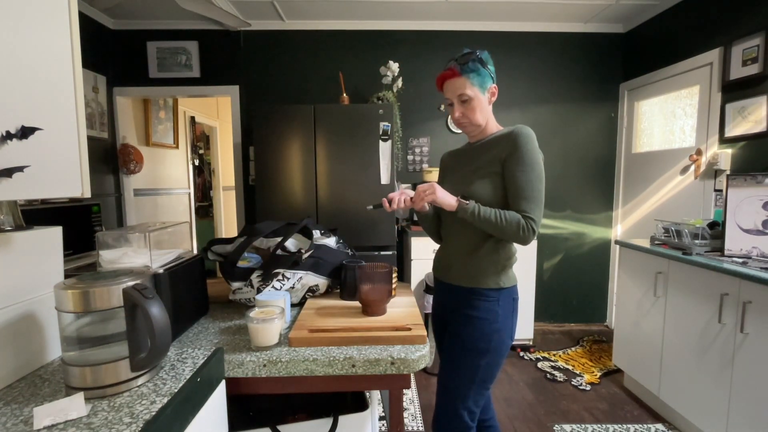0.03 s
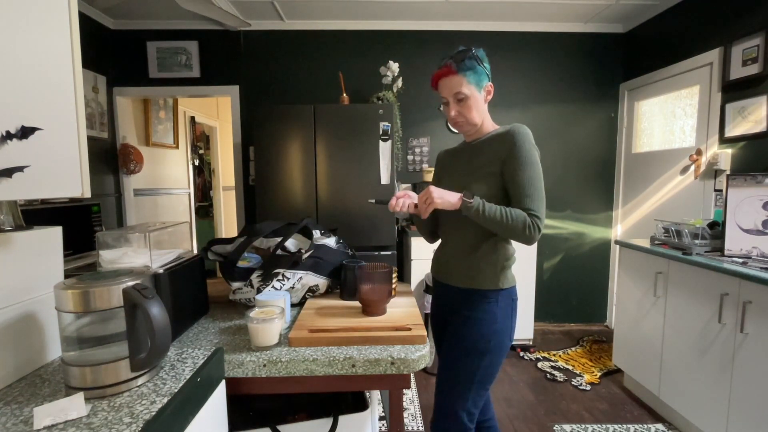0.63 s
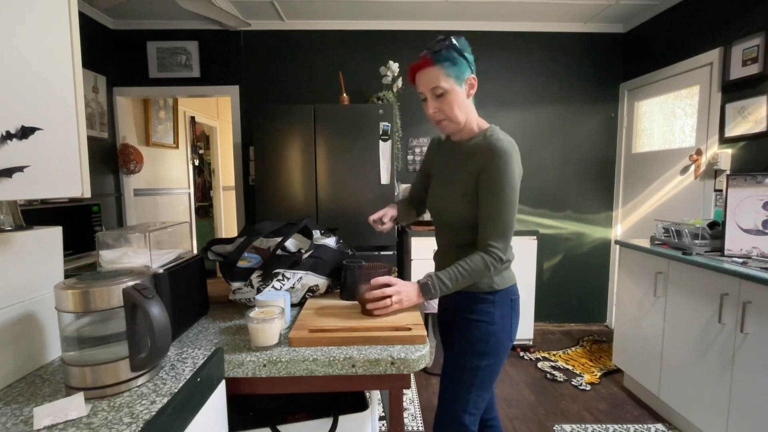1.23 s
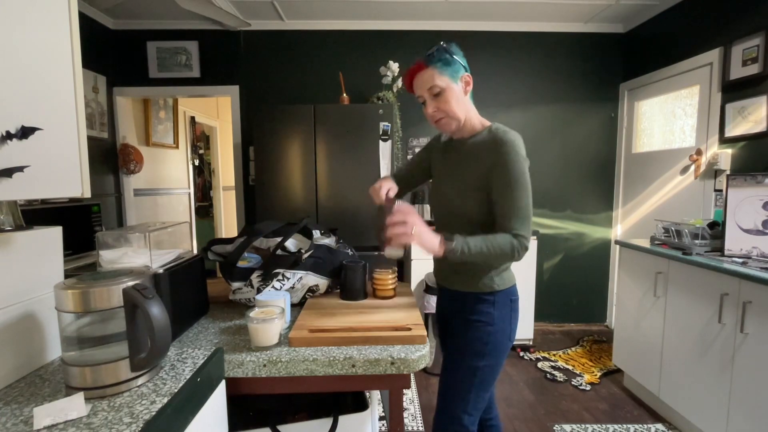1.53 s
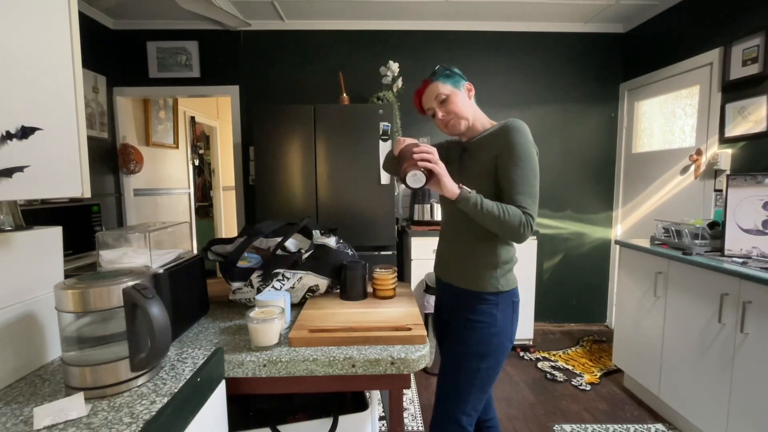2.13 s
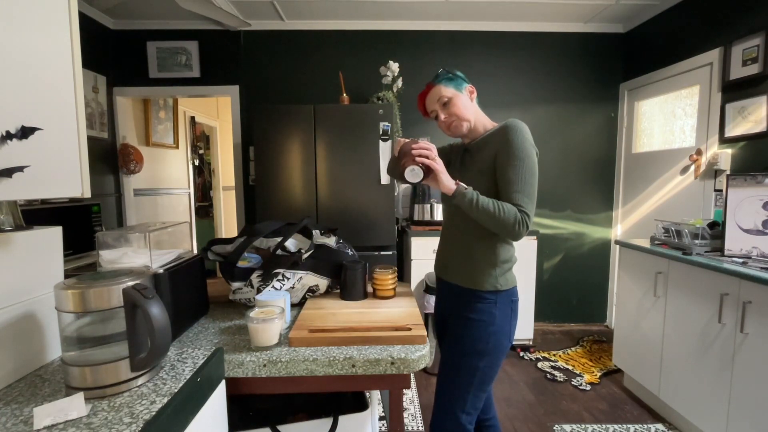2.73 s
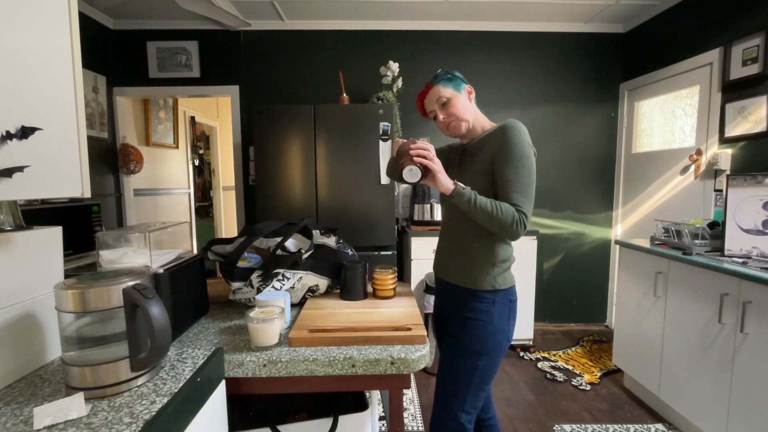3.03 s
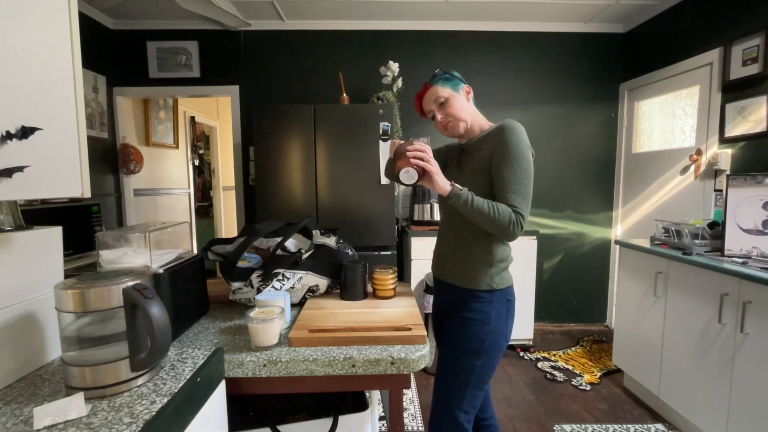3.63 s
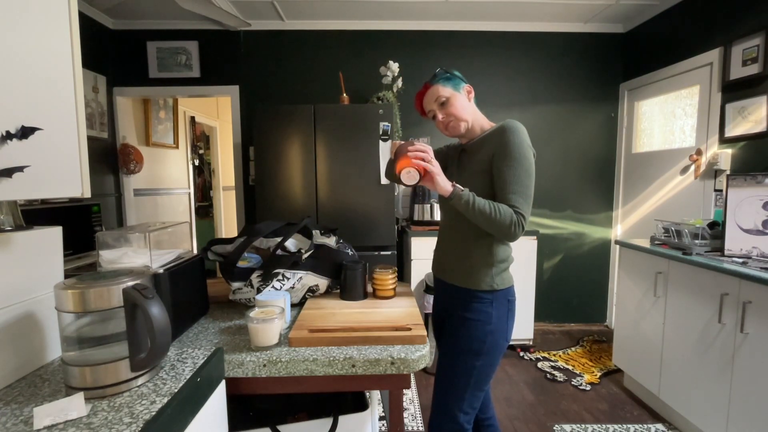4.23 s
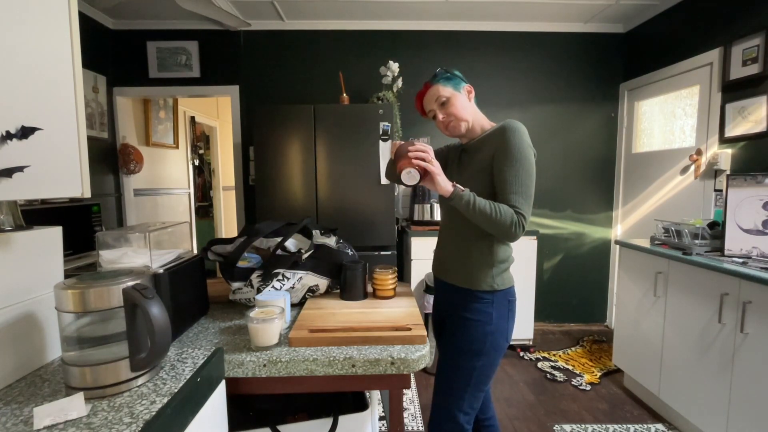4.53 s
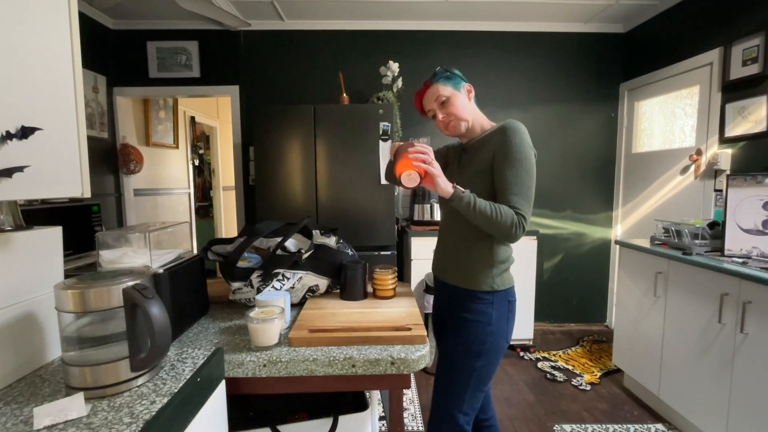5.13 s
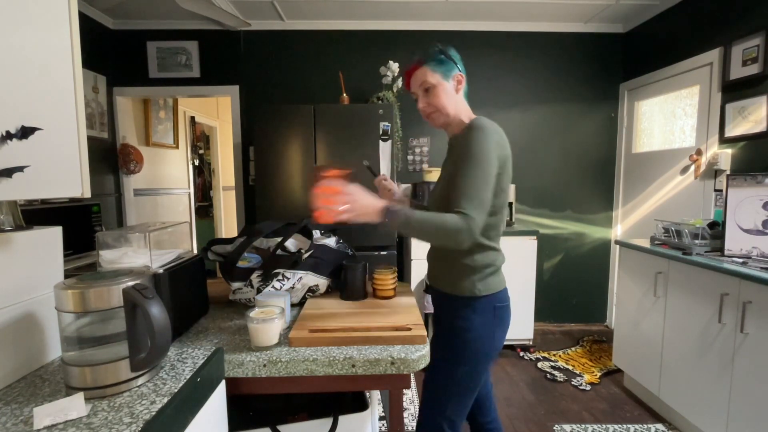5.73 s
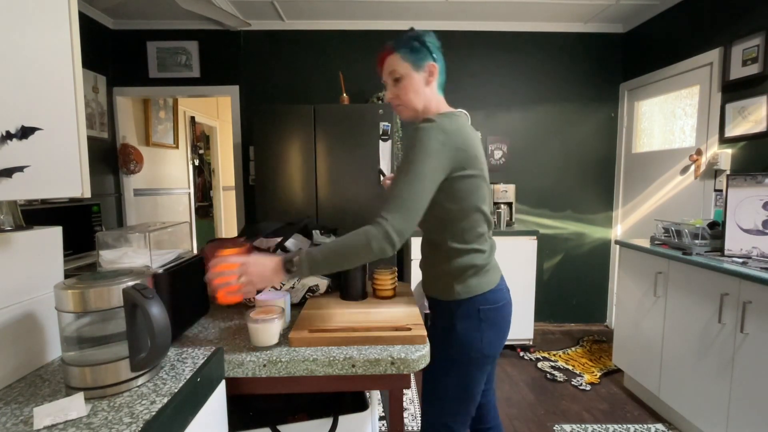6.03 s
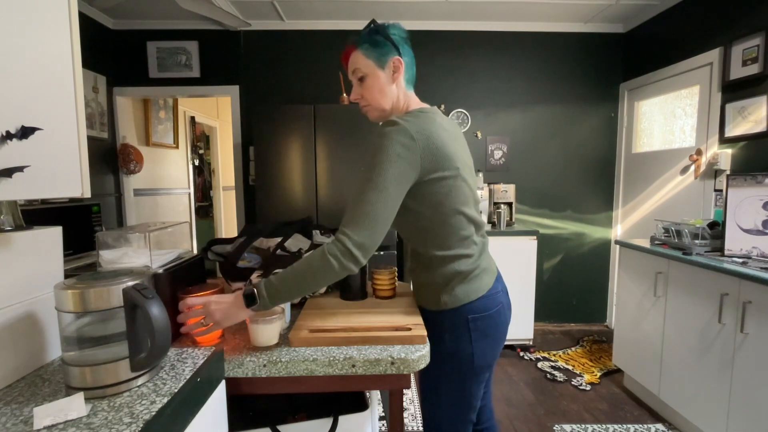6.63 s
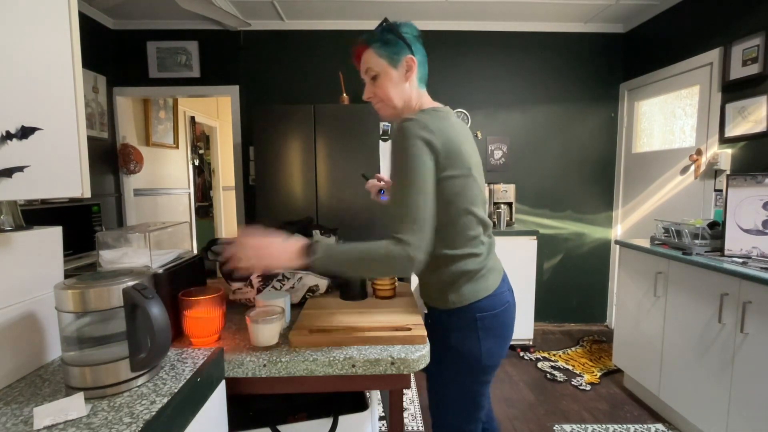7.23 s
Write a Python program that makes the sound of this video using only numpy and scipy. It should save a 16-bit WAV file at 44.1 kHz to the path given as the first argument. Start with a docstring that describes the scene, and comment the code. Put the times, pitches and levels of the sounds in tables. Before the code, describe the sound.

A low, steady rumble fills a small, quiet kitchen throughout. For the first two seconds, sleeves rustle faintly and fingers slide over a gas lighter and a glass candle jar, with soft low bumps and small clicks, the sharpest at about 1 second. From 2 seconds, gas hisses and spits quietly while the flame flutters in uneven little flares, sounding hollow inside the jar. The hiss drops out around 3 seconds, returns at 3.5 and stops with the flame near 5.4. Faint cloth rustles and finger rubs follow. At about 6.7 seconds the jar meets the stone counter with a loud thud, then a sharper clack at 6.9. These two knocks are by far the loudest sounds, with a brief glass ring and a short room echo. A soft bump and a tiny click close at around 7.3 seconds.

```python
"""A quiet kitchen, small and hard-walled, with a low rumble. Sleeves rustle and fingers slide as a gas
lighter is handled and clicked, then held down a glass candle jar. The gas hisses and spits, and the
flame flutters with a roar that the jar and the room make hollow. Last, the jar is set on a stone
counter with two knocks that thump the stone, set the glass ringing and echo in the room."""
import sys
import numpy as np
from scipy import signal
from scipy.fft import rfft, irfft, next_fast_len
from scipy.io import wavfile
from scipy.ndimage import map_coordinates

SR = 44100
rng = np.random.default_rng(int(sys.argv[2]) if len(sys.argv) > 2 else 0)


def master(y):
    """Save y as 16-bit WAV."""
    cut = np.clip(np.atleast_2d(y).T, -1, 1)
    pcm = np.round(cut * 32767)  # scale
    wavfile.write(sys.argv[1], SR, pcm.astype(np.int16))


N = 325017
TAIL_SAMPLES = 32768  # length of an echo or a ring
TOP_HZ = 15800

# A fade time is how long a sound takes to drop by 60 dB. A TONE table says how strong each pitch is.
# the kitchen's echo: (frequency [Hz], fade time [s])
ROOM_FADE = [(80, 0.77), (250, 0.3), (700, 0.4), (1500, 0.45), (4000, 0.42), (8000, 0.38), (13000, 0.48)]
# how alike the left and right sides sound: (frequency [Hz], likeness [0 to 1])
LIKENESS = [(60, 1), (120, 0.69), (250, 0.16), (450, 0), (10000, 0.04)]
# background rumble, deeper drone and thin hiss: (frequency [Hz], gain [dB])
RUMBLE_TONE = [(25, -42), (42, -11.5), (62, 5), (80, 0), (100, -4.5), (120, -7), (150, -20), (200, -20),
               (300, -31), (500, -44), (1200, -120)]
DRONE_TONE = [(18, -47.5), (30, -29.5), (39, -10), (48, 6.5), (58, -6.5), (75, -13.5), (120, -50.5),
              (300, -120)]
AIR_TONE = [(200, -30), (330, -8), (520, -7), (700, -9.5), (1400, -16), (3000, -20.5), (7000, -21.5),
            (9800, -19.5), (11000, -29), (12800, -31.5), (15000, -56)]

# sleeves brush, and fingers slide over lighter and jar: (time [s], length [s], level [dB])
SLEEVE_RUBS = [(.16, .05, -70), (.77, 0.14, -76.5), (.89, 0.13, -69), (1.155, 0.025, -62), (1.24, .08, -76),
               (1.52, 0.34, -86.5), (5.39, 0.038, -67), (5.595, 0.089, -65.5), (5.72, 0.17, -72),
               (5.89, 0.083, -66.5), (6.16, 0.098, -66), (6.375, .03, -68.5), (6.47, 0.27, -75),
               (6.635, 0.056, -59.5)]
FINGER_SLIDES = [(.24, .05, -83), (.4, 0.094, -71), (.48, 0.05, -65.5), (.62, 0.056, -76),
                 (.75, 0.059, -74.5), (.95, 0.12, -74.5), (1.17, 0.091, -75.5), (5.53, 0.74, -81),
                 (6.21, 0.25, -72.5), (6.5, .17, -72.5)]
# rubbing cloth and rubbing skin: (frequency [Hz], gain [dB])
SLEEVE_TONE = [(150, -5), (350, -1.5), (900, -0.5), (1400, -4), (2000, -7.5), (3200, -26), (8000, -26.5),
               (15000, -65)]
FINGER_TONE = [(300, -27.5), (1000, -8), (1900, 4.5), (3200, -1.5), (5000, -6.5), (8000, -9),
               (11500, -16.5), (15000, -50.5)]
# pitches that the sliding brings out: (frequency [Hz], width [Hz], boost [dB])
FINGER_PEAKS = [(3060, 510, 4.5), (4400, 610, 6.5)]
# soft low bumps: (time [s], level [dB])
SOFT_BUMPS = [(.27, -49.5), (1.163, -49.5), (1.597, -63), (7.051, -49.5), (7.211, -60)]
# a faint hum swells twice: (time [s], length [s], level [dB])
HUM_SWELLS = [(.44, 0.38, -64.5), (.93, 0.11, -63)]

# small clicks of lighter and glass, and a soft pop as the flame flares:
# (time [s], snap level [dB], pitch [Hz], boost at that pitch [dB], body compared with snap [dB])
SMALL_CLICKS = [(0.5296, -62, 5000, 14, -8.5), (0.7328, -63.5, 2850, 5.5, -3.5),
                (0.9567, -68, 3550, 6, -2.5), (1.056, -50.5, 7200, 11.5, -14), (1.062, -59, 7300, 23, -1.5),
                (1.2543, -72.5, 8900, 13, 0), (1.3421, -63.5, 8100, 8, -20),
                (1.847, -67.5, 8200, 10.5, -18), (2.037, -73, 9200, 20, -2), (4.457, -77, 3880, 6, 8),
                (5.183, -80, 3600, 7, 4), (5.911, -72, 7800, 13, -8), (6.3957, -68, 6740, 9, -4),
                (7.3394, -66.5, 6220, 5.5, 0)]
# a click's bright snap and its duller body: (frequency [Hz], gain [dB])
SNAP_TONE = [(800, -13.5), (2800, 6.5), (5500, -2), (9000, -1), (12000, -9), (15000, -31)]
BODY_TONE = [(100, -40.5), (600, -7), (1100, 3.5), (2200, -1.5), (4000, -15.5), (15000, -58)]

# the flame flares up: (time [s], length [s], roar level [dB], rasp level [dB])
FLAME_FLARES = [(2.029, 0.11, -60.5, -67.5), (2.176, 0.073, -64, -90), (2.368, 0.084, -62, -67.5),
                (2.47, 0.054, -66, -72), (2.558, 0.13, -61, -70.5), (2.702, 0.067, -62.5, -82),
                (2.85, .04, -74, -97), (2.898, 0.021, -61, -95), (3.13, .03, -77.5, -98),
                (3.194, 0.046, -61, -73), (3.297, 0.06, -55, -63.5), (3.546, 0.1, -73.5, -93),
                (3.662, 0.038, -67, -79), (3.721, 0.11, -63, -68.5), (3.858, 0.16, -72, -93),
                (4.046, .03, -82, -74), (4.34, 0.029, -69, -82), (4.444, 0.056, -59.5, -67),
                (4.536, .08, -67, -92), (4.625, 0.028, -60, -80), (4.708, 0.035, -73, -95),
                (4.843, .04, -69, -80), (4.957, 0.047, -62, -80), (5.063, 0.051, -61.5, -76),
                (5.172, 0.058, -65, -69.5)]
# the flame's roar and the rasp of its torn edge: (frequency [Hz], gain [dB])
ROAR_TONE = [(200, -11), (450, -2), (680, 2), (1100, 1), (1450, -14.5), (2400, -13), (5000, -20),
             (8000, -14.5), (15000, -51)]
RASP_TONE = [(300, -2), (1200, 5), (2800, 0.5), (5000, -2.5), (8000, -4), (11500, -5.5), (15000, -55)]
# hollow pitches of the jar and the room that colour the roar: (frequency [Hz], width [Hz], boost [dB])
HOLLOW_PEAKS = [(652, 36, 9.5), (784, 27, 15), (868, 31, 4), (813, 280, 4.5), (1957, 170, 23.5),
                (3930, 67, 0), (5100, 110, -6)]
# the jar's high overtones: (frequency [Hz], width [Hz], boost [dB])
WHISTLE_PEAKS = [(3820, 200, 6), (5120, 180, 8)]
# the gas jet spits: (time [s], level [dB], pitch [Hz], width [Hz], fade time [s])
GAS_SPITS = [(2.038, -71, 15200, 910, 0.068), (2.06, -72, 3730, 90, 0.68), (2.21, -69, 7700, 2250, 0.72),
             (2.434, -66, 4320, 1200, 0.44), (4.065, -68.5, 10000, 2500, 0.35),
             (5.19, -75, 6940, 7000, 0.56), (5.247, -66, 1930, 3520, 0.33)]
# gas flow, one list for each of the two times the lighter is held: (time [s], relative level [dB])
GAS_HOLDS = [
    [(2.04, -74), (2.13, -73), (2.182, -79), (2.222, -77), (2.42, -83), (2.44, -73), (2.624, -70),
     (2.816, -79), (2.9, -89)],
    [(3.5, -92), (3.562, -79.5), (4.106, -75), (4.156, -83), (4.638, -82), (4.804, -69.5), (4.928, -80.5),
     (5.266, -79.5), (5.36, -100)],
]
# gas leaving the nozzle: (frequency [Hz], gain [dB])
JET_TONE = [(400, -34.5), (1500, -12), (3000, -10), (4000, -8.5), (7000, -4.5), (9500, 6), (11500, 2),
            (12600, -13), (15000, -36.5)]

# the jar meets the counter, first on its edge, then flat:
# (time [s], thud level [dB], clack level [dB], ring gain [dB], hardness as a treble limit [Hz])
JAR_CONTACTS = [(6.679, -27, -47, -64, 4500), (6.682, -14, -39.5, -32, 1900), (6.72, -27, -62.5, -49, 1800),
                (6.745, -26.5, -62.5, -42, 1495), (6.8716, -29, -26.5, -31, 9000),
                (6.876, -16.5, -30.5, -40.5, 3500)]
# the thud of counter and jar base, and the clack of glass on stone: (frequency [Hz], gain [dB])
THUD_TONE = [(40, -34), (105, -10.5), (190, -16.5), (330, -16.5), (420, -9.5), (490, -1), (800, -2),
             (1100, -1.5), (1280, -8.5), (1900, -14), (2700, -20), (3800, -32), (6500, -62.5),
             (14000, -77.5)]
CLACK_TONE = [(400, -38.5), (1500, -10), (2700, 6.5), (4000, -1), (5600, -8.5), (7000, -24.5), (8000, -9.5),
              (9500, -22), (11000, -52), (15000, -41)]
# pitches at which the counter and jar base boom: (frequency [Hz], width [Hz], boost [dB])
THUD_PEAKS = [(247, 14, 15.5), (864, 65, 10.5), (1427, 26, 11)]
# notes of the jar and counter ringing together: (frequency [Hz], relative level [dB], fade time [s])
RING_NOTES = [(251, -6, .42), (503, -2, .33), (611, -3, .33), (721, 0, .36), (797, -1, .3), (878, 12, .32),
              (939, 5, .32), (1073, 6, .34), (1176, -4, .33), (1355, -7, .38), (1453, 2, .42),
              (1580, -3, .36), (1823, 2, .45), (1943, -7, .45), (2044, -3, .42), (2547, -5, .34),
              (2563, -1, .43), (2845, -7, .33), (3311, -11, .36), (3570, -9, .28), (3850, -2, .33),
              (4011, 0, .27), (4759, -13, .3), (5604, -19, .3), (7994, -17, .27), (8130, -19, .27),
              (11980, -25, .28), (13190, -19, .33)]


def amp(db):
    """Turn decibels into a gain to multiply by."""
    return 10 ** (np.asarray(db) / 20)


def along(points, hz):
    """Read between the rows of a (frequency, value) table, on a log frequency scale."""
    freqs, values = np.transpose(points)
    return np.interp(np.log(hz + 1), np.log(freqs + 1), values)


def wobble(rate):
    """A smooth random curve through `rate` points a second."""
    points = rng.standard_normal(int(N * rate / SR) + 4)
    fine = np.arange(len(points) * 8) / 8
    return np.interp(np.arange(N) * rate / SR, fine, map_coordinates(points, [fine]))


def colour(x, tone, peaks=(), size=8192):
    """Filter x with a broad tone and narrow peaks on top of it."""
    hz = np.fft.rfftfreq(size, 1 / SR)
    gain = amp(along(tone, hz))
    for centre, width, db in peaks:
        gain *= np.sqrt(1 + (amp(db) ** 2 - 1) / (1 + (2 * (hz - centre) / width) ** 2))
    # make the filter ring only after a sound, never before it
    cepstrum = irfft(np.log(np.maximum(gain, 1e-6)))
    fold = 1 + np.sign(size // 2 - np.arange(size))
    fold[0] = 1
    response = irfft(np.exp(rfft(cepstrum * fold)))
    return signal.fftconvolve(x, response[None], axes=1)[:, :x.shape[1]]


def noise(tone, peaks=(), shake=1):
    """Filtered stereo noise of average power 1; `shake` varies its strength before the filter."""
    size = next_fast_len(N + SR // 2, real=True)
    likeness = np.clip(along(LIKENESS, np.fft.rfftfreq(size, 1 / SR)), -1, 1)
    spread = np.arccos(likeness) / 2
    white = rfft(rng.standard_normal((2, size)))
    mid, side = irfft(white * [np.cos(spread), np.sin(spread)], size)
    pair = np.array([mid + side, mid - side])
    pair[:, -N:] *= shake
    pair = colour(pair, tone, peaks)[:, -N:]
    return pair / np.sqrt(np.mean(pair ** 2) + 1e-20)


def echo(direct_db, early_db, lag_s):
    """One sharp tap as it arrives: straight, off nearby surfaces, then as the room's fading echo."""
    hz, times, wash = signal.stft(rng.standard_normal((2, TAIL_SAMPLES)), SR, nperseg=256)
    likeness = np.clip(along(LIKENESS, hz), -1, 1)[:, None]
    wash[1] = likeness * wash[0] + np.sqrt(1 - likeness ** 2) * wash[1]
    fade = amp(-60 * times / along(ROOM_FADE, hz)[:, None])
    tail = signal.istft(wash * fade, SR, nperseg=256)[1][:, :TAIL_SAMPLES]
    t = np.arange(TAIL_SAMPLES) / SR
    early_boost = 1 + amp(early_db) * np.exp(-t / .012)
    tail = tail / np.linalg.norm(tail[0]) * early_boost
    arrival = (abs(lag_s) + np.array([[-lag_s], [lag_s]])) / 2  # positive lag: left comes first
    return tail + amp(direct_db) * np.sinc((t - arrival) * SR)


def struck(x, db):
    """Scale x so that its first 30 ms have this level."""
    return amp(db) * x / np.sqrt(np.mean(x[:, :round(.03 * SR)] ** 2))


def add(track, start, x):
    """Mix x into the track at `start` seconds."""
    part = track[:, round(start * SR):][:, :x.shape[1]]
    part += x[:, :part.shape[1]]


def pan(db):
    """Left and right gains; positive dB leans left."""
    return amp([[db / 2], [-db / 2]])


def swells(rows, rise_s, fade_s):
    """A loudness curve from (time, length, level) rows: each rises, holds, then dies away."""
    t = np.arange(2 * SR) / SR
    power = np.zeros((1, N))
    for start, length, db in rows:
        gain = np.minimum(t / rise_s, 1) * amp(db - 60 * np.maximum(t - length, 0) / fade_s)
        add(power, start, gain[None] ** 2)
    return np.sqrt(power[0])


def room_tone():
    """A low rumble, a deeper drone that drifts in level, and a thin hiss."""
    drone = amp(-62.5 + 1.5 * wobble(rate=3.4)) * noise(DRONE_TONE)
    return amp(-58) * noise(RUMBLE_TONE) + drone + amp(-77) * noise(AIR_TONE)


def sleeves():
    """Cloth brushes as the arms move, catching unevenly."""
    strokes = swells(SLEEVE_RUBS, rise_s=0.023, fade_s=0.23)
    return strokes * amp(1.4 * wobble(rate=67)) * noise(SLEEVE_TONE)


def fingers():
    """Skin catches and slips on the lighter and the jar."""
    strokes = swells(FINGER_SLIDES, rise_s=0.021, fade_s=0.28)
    return strokes * amp(2.2 * wobble(rate=110)) * noise(FINGER_TONE, FINGER_PEAKS)


def bumps():
    """Soft low thuds linger in the room."""
    out = np.zeros((2, N))
    dull_tone = [(25, 2), (50, -1), (100, -3.5), (220, -29.5), (700, -37), (3000, -76)]  # (Hz, dB)
    for start, db in SOFT_BUMPS:
        tap = echo(direct_db=-17, early_db=12, lag_s=0)
        add(out, start, struck(colour(tap, dull_tone), db))
    return out


def hum():
    """A faint low note swells twice, wavering in pitch."""
    pitch_hz = 143 + 2.5 * wobble(rate=6.34)
    note = np.sqrt(2) * np.sin(2 * np.pi * np.cumsum(pitch_hz) / SR)
    return swells(HUM_SWELLS, rise_s=0.093, fade_s=0.35) * note


def clicks():
    """Lighter and glass click, and the flame pops softly: each is a bright snap with a duller body."""
    out = np.zeros((2, N))
    for start, db, hz, boost_db, body_db in SMALL_CLICKS:
        tap = echo(direct_db=-7.5, early_db=-10.5, lag_s=0.00005)
        snap = colour(tap, SNAP_TONE, peaks=[(hz, 900, boost_db)])
        body = colour(tap, BODY_TONE, peaks=[(3000, 590, 9.2)])
        add(out, start, struck(snap, db) + struck(body, db + body_db))
    return out


def flame():
    """Each flare roars, made hollow by the jar and the room, while its torn edge rasps above."""
    starts, lengths, roar_db, rasp_db = np.transpose(FLAME_FLARES)
    rise_s, fade_s = 0.019, 0.33
    flutter = swells(zip(starts, lengths, roar_db), rise_s, fade_s)
    tearing = swells(zip(starts, lengths, rasp_db), rise_s, fade_s)
    roar = noise(ROAR_TONE, HOLLOW_PEAKS, shake=amp(1.6 * wobble(rate=70)))
    rasp = noise(RASP_TONE, WHISTLE_PEAKS)
    return flutter * roar + tearing * rasp


def gas_spits():
    """The jet gives short hisses as the valve opens, settles and closes."""
    out = np.zeros((2, N))
    t, hz = np.arange(SR) / SR, np.fft.rfftfreq(SR, 1 / SR)
    for start, db, centre_hz, width_hz, fade_s in GAS_SPITS:
        white = rfft(rng.standard_normal((2, SR)))
        hiss = irfft(white / (1 + (2 * (hz - centre_hz) / width_hz) ** 2), SR)
        add(out, start, struck(hiss * amp(-60 * t / fade_s), db))
    return out


def gas_jet():
    """Gas hisses unevenly from the nozzle and brings out the jar's high overtones."""
    t = np.arange(N) / SR
    flow = np.zeros(N)
    for hold in GAS_HOLDS:
        times, db = np.transpose(hold)
        flow += amp(np.interp(t, times, db, left=-120, right=-120))
    flicker = amp(3.54 + 0.6 * wobble(rate=35))
    return flow * flicker * noise(JET_TONE, WHISTLE_PEAKS) * pan(db=-3)


def glass_rings(echo_depth, drift_rate, lag_s, rise_s):
    """One fading ring per note; echoes build up and make it swell and dip on each side."""
    t = np.maximum(np.arange(TAIL_SAMPLES) / SR - np.array([[0], [lag_s]]), 0)
    echoes = echo_depth * (1 - np.exp(-t / 0.02))
    rings = []
    for k, (hz, db, fade_s) in enumerate(RING_NOTES):
        points = rng.standard_normal((2, 200)) + 1j * rng.standard_normal((2, 200))
        drift = np.array([np.interp(t[0] * drift_rate, np.arange(len(row)), row) for row in points])
        wave = np.imag((1 + echoes * drift) * np.exp(2j * np.pi * hz * t))
        rings.append((-1) ** k * amp(db - 60 * t / fade_s) * wave)
    return np.array(rings) * (1 - np.exp(-t / rise_s))


def jar_knocks():
    """Each contact thumps the counter; harder ones clack and ring the glass's high notes."""
    out = np.zeros((2, N))
    rings = glass_rings(echo_depth=0.56, drift_rate=44, lag_s=0.00035, rise_s=0.00067)
    note_hz = np.transpose(RING_NOTES)[0]
    for start, thud_db, clack_db, ring_db, limit_hz in JAR_CONTACTS:
        tap = echo(direct_db=-9, early_db=-6.5, lag_s=0.0005)
        # a soft contact lasts longer, so it barely stirs notes above its limit
        strengths = 1 / np.sqrt(1 + (note_hz / limit_hz) ** 4)
        add(out, start, struck(colour(tap, THUD_TONE, THUD_PEAKS), thud_db) * pan(db=1.5))
        add(out, start, struck(colour(tap, CLACK_TONE), clack_db) * pan(db=2))
        add(out, start, amp(ring_db) * np.tensordot(strengths, rings, 1) * pan(db=5.5))
    return out


def scene():
    """Add up every sound in the kitchen."""
    return (room_tone() + sleeves() + fingers() + bumps() + hum() + clicks()
            + flame() + gas_spits() + gas_jet() + jar_knocks())


def record(dry):
    """Cut away the treble above TOP_HZ."""
    size = next_fast_len(N + SR // 2)
    kept = np.fft.rfftfreq(size, 1 / SR) < TOP_HZ
    return irfft(rfft(dry, size) * kept, size)[:, :N]


dry = scene()
out = record(dry)
master(out)
```